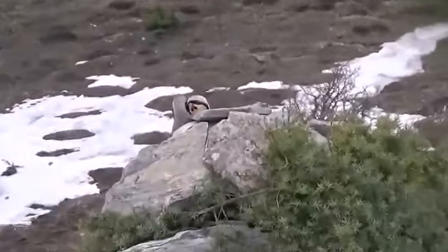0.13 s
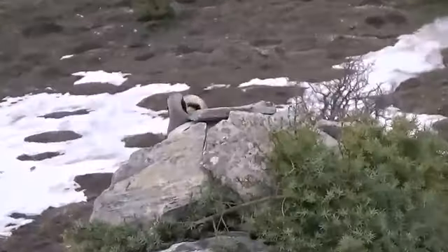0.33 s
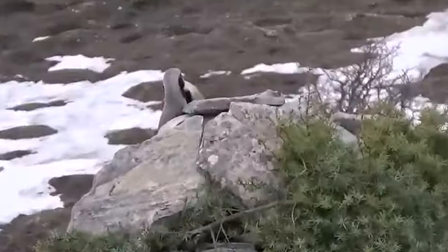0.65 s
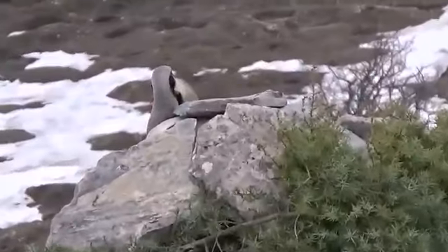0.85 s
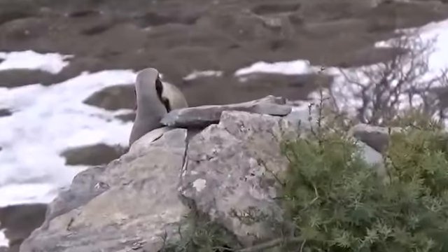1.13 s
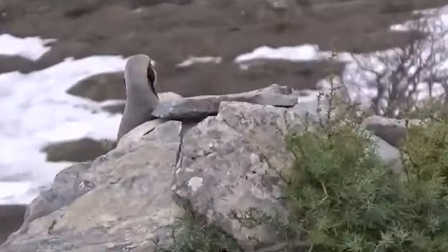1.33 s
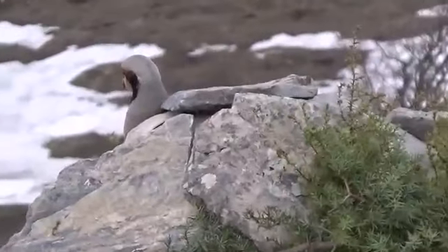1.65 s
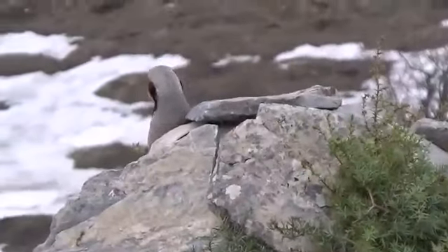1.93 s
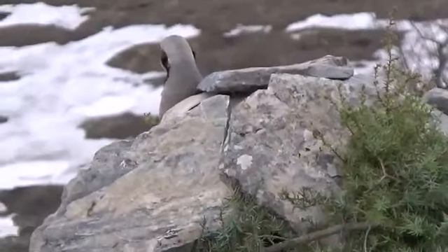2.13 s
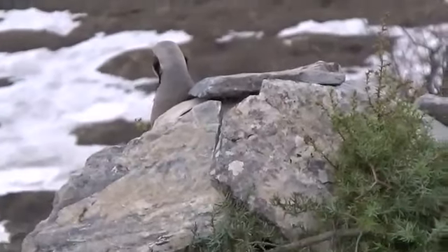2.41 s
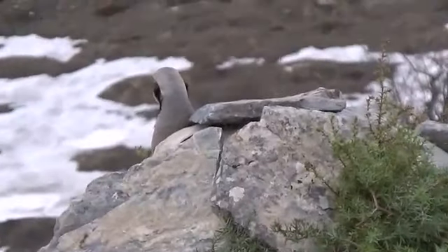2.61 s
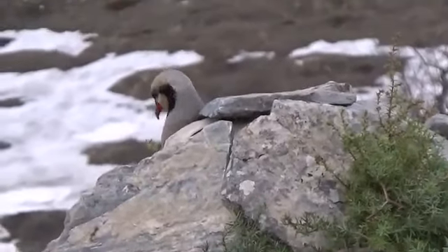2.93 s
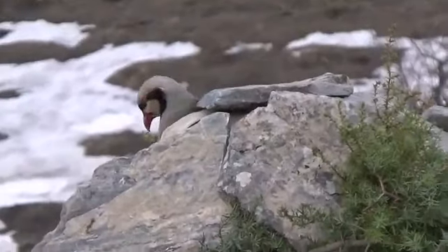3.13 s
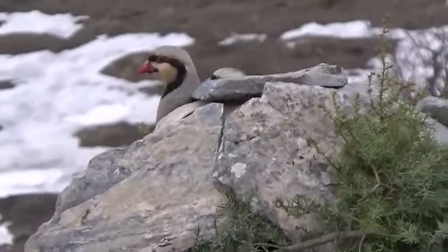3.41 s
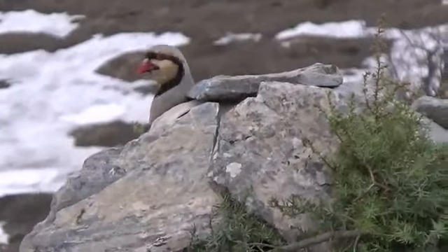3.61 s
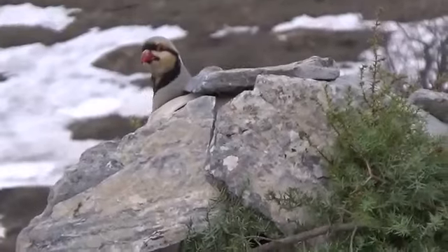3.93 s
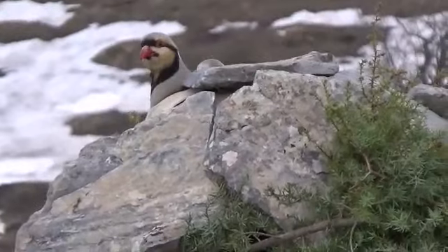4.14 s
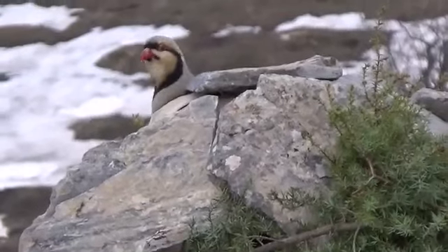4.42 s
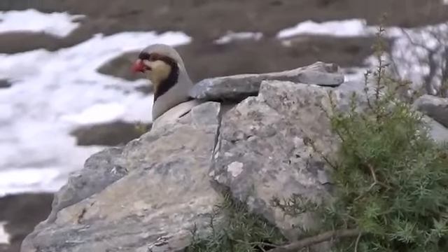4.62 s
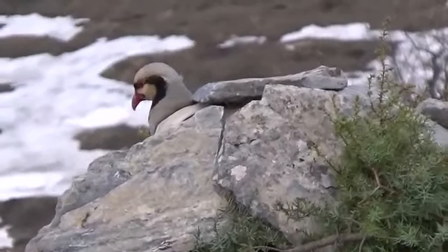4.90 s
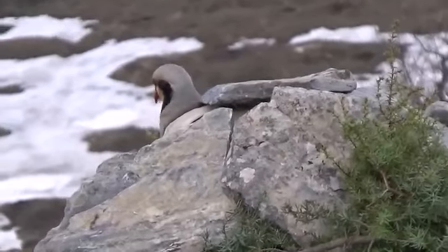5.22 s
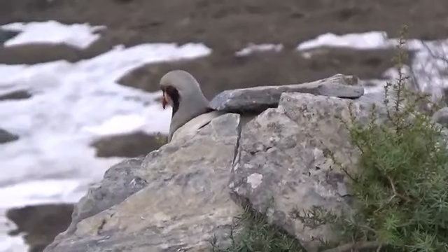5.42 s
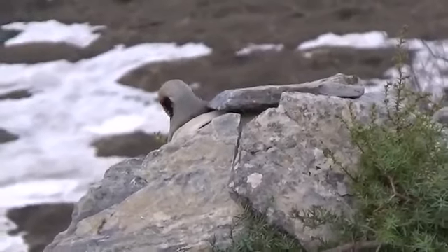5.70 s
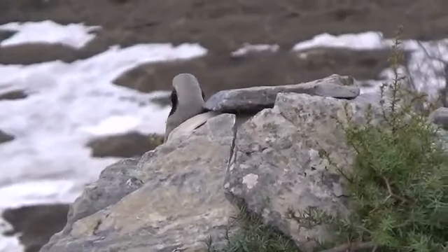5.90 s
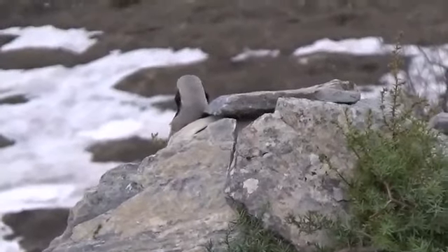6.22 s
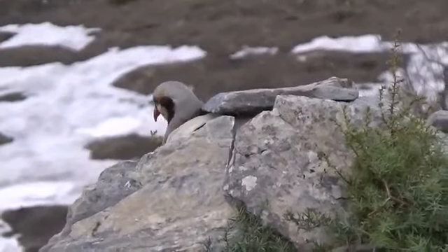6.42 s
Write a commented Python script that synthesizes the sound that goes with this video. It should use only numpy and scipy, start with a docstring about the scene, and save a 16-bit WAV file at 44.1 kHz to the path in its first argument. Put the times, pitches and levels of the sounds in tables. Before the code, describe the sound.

On a quiet mountainside, nearby partridges trade short, high squeaky calls and raspy notes, with occasional stone clicks and twig snaps.

```python
"""Chukar partridges on a mountainside

Close to the microphone and a little to the right, the birds call to one another across a quiet slope.
The syrinx whistles quick arches of pitch, hoarse at the ends and purer on top: high squeals that drop
into a low cluck, soft peeps, fluttering rasps. Stones click and twigs snap over a light breeze and hiss."""
import sys
import numpy as np
from scipy import signal
from scipy.fft import rfft, irfft
from scipy.io import wavfile
from scipy.ndimage import map_coordinates

SR = 44100
rng = np.random.default_rng(int(sys.argv[2]) if len(sys.argv) > 2 else 0)


def digitize_waveform(pressure):
    """Quantize a signal to 16-bit integers and store it at the path in sys.argv[1].

    Rows of a 2-D input are taken as channels; values are limited to [-1, 1].
    """
    field = np.atleast_2d(pressure).T
    bounded = np.clip(field, -1, 1)
    quanta = np.round(bounded * 32767).astype(np.int16)
    wavfile.write(sys.argv[1], SR, quanta)


N = 288855
FOOT_HZ = 1488  # squeals and rasps climb from this pitch
# resonances of the bird's throat: f/Hz, width/Hz, level/dB
THROAT_MODES = [(1566, 160, 4), (2018, 215, 11.5), (2350, 380, 6.5), (3626, 610, 6.5), (4850, 540, 1),
                (5790, 230, -19.5), (8750, 1200, -49), (10580, 690, -12.5)]
# bright spectrum of a snapping twig and of the fizz at the beak: f/Hz, level/dB
BRIGHT_SPECTRUM = [(500, -3), (2000, -10.5), (4000, -5.5), (5200, -1.5), (6500, -2), (8200, 2), (10500, 4),
                   (12000, -46)]


def gain_of(db):
    """Decibels to amplitude."""
    return 10 ** (np.asarray(db) / 20)


def unit_rms(x):
    """Scales to rms 1."""
    return x / np.sqrt(np.mean(x ** 2) + 1e-20)


def add(mix, start, sound):
    """Mixes a sound in at its start time."""
    part = mix[max(round(start * SR), 0):][:len(sound)]
    part += sound[:len(part)]


def gain_at(spectrum, hz):
    """Gain of a spectrum at the given frequencies."""
    f, db = np.transpose(spectrum)
    return gain_of(np.interp(np.log(hz + 1), np.log(f), db))


def noise(spectrum, size):
    """Noise of rms 1 with the given spectrum."""
    gains = gain_at(spectrum, np.fft.rfftfreq(size, 1 / SR))
    return unit_rms(irfft(rfft(rng.standard_normal(size)) * gains, size))


def wander(t, rate):
    """A smooth random curve of rms about 1 that changes rate times a second."""
    knots = rng.standard_normal(int((t[-1] - t[0]) * rate) + 4)
    return map_coordinates(knots, [(t - t[0]) * rate + 1], order=3, mode="nearest")


def resonate(x, modes):
    """A bank of resonances, each applied twice for steep skirts."""
    out = 0
    for hz, width, db in modes:
        b, a = signal.iirpeak(hz, hz / (1.55 * width), fs=SR)
        out = out + gain_of(db) * signal.lfilter(b, a, signal.lfilter(b, a, x))
    return out


def air():
    """A steady hiss and a soft breeze that swells now and then, mostly alike left and right."""
    # spectra of the hiss and of the moving air: f/Hz, level/dB
    hiss = [(15, -95), (25, -26), (118, -9.5), (531, -10.5), (619, -26.5), (778, -15), (1110, -13.5),
            (1400, -9), (2050, -12.5), (2390, -11.5), (3320, -15.5), (3680, -11.5), (4870, -15.5),
            (8310, -13), (11000, -17), (14300, -119), (22000, -120)]
    breeze = [(100, -31), (250, -14), (430, -5), (800, -7), (1300, -13), (2500, -18), (5000, -25),
              (11000, -35.5)]
    # strength of the breeze: t/s, relative level/dB
    gusts = [(0.0, -67.5), (1.06, -66), (1.88, -69), (1.99, -67), (2.39, -68.5), (2.72, -67), (3.1, -68),
             (3.57, -66), (3.81, -66.5), (4.45, -62.5), (5.05, -70), (6.29, -69), (6.55, -71.5)]
    t = np.arange(N) / SR
    swell = gain_of(1.5 + np.interp(t, *np.transpose(gusts)) + 1.02 * wander(t, 26))
    mid, side = (gain_of(-69) * noise(hiss, N) + swell * noise(breeze, N) for _ in range(2))
    return mid + gain_of(-9) * side * np.array([[1], [-1]])


def membrane(t, hz, jitter):
    """One sharp pulse each time the bird's slow membrane closes, unevenly spaced."""
    turns = np.cumsum(hz * (1 + jitter * wander(t, 700))) / SR + rng.random()
    return unit_rms(sum(np.cos(2 * np.pi * k * turns) for k in range(1, 24)))


def syrinx(t, hz, level_db, hoarse, beak_db, flutter, base_flutter_hz, kick, split, rattle_db,
           second_db, third_db, half_db, croak_db, fizz_db):
    """The syrinx whistles along a pitch curve; as hoarseness grows it flutters, then croaks."""
    # how throat and open beak pass the overtones: f/Hz, level/dB
    beak_response = [(2600, -9.5), (3500, -3), (4300, -16.5), (5000, -10), (6100, -14.5), (7000, -33.5),
                     (8000, -24.5), (9300, -29), (11000, -20)]
    hoarse = np.clip(hoarse, .002, .97)
    # flutter comes in fits; each cycle chokes the whistle for an instant and kicks its pitch up
    flutter_hz = base_flutter_hz * (1 + 1.2 * hoarse) * np.exp(.28 * wander(t, 49.22))
    cycles = np.cumsum(flutter_hz) / SR
    fits = np.exp(.7 * wander(t, 45))
    choke = np.cos(np.pi * cycles) ** 8 * np.tanh(flutter * hoarse * fits)
    hz = hz * (1 + kick * choke + .0031 * wander(t, 121.3) + .0614 * hoarse * wander(t, 301.5))
    # a second, slow membrane beats against the whistle and splits it in two
    slow_hz = 430 + .04 * hz
    slow_phase = 2 * np.pi * np.cumsum(slow_hz * (1 + .0517 * wander(t, 198.7))) / SR
    phase = 2 * np.pi * np.cumsum(hz) / SR + .5 * hoarse * np.sin(slow_phase)
    whistle = np.sin(phase) + split * hoarse * np.sin(phase - slow_phase)
    # the half-order overtone comes from strong and weak cycles taking turns
    for k, db in [(2, second_db), (3, third_db), (3 / 2, half_db)]:
        flicker_db = 2.5 * wander(t, 110)
        whistle += gain_of(db + beak_db + flicker_db) * gain_at(beak_response, k * hz) * np.sin(k * phase)
    whistle = unit_rms(whistle * (1 - .85 * choke))
    pulses = membrane(t, slow_hz * (1 + .1 * wander(t, 90)), jitter=.06)
    throat = resonate(pulses + .25 * rng.standard_normal(len(t)), THROAT_MODES)
    croak = unit_rms(throat * (1 - .7 * choke))
    fizz = gain_of(fizz_db + beak_db) * np.sqrt(hoarse) * (1 - choke) * noise(BRIGHT_SPECTRUM, len(t))
    voice = np.sqrt(1 - hoarse ** 2) * whistle + hoarse ** 1.39 * gain_of(croak_db) * croak + fizz
    # a hoarse voice comes in lumps
    rattle = unit_rms(gain_of(rattle_db * np.sqrt(hoarse) * np.tanh(wander(t, 170))))
    fade = signal.windows.tukey(len(t), min(1, .0031 * SR / len(t)))
    return gain_of(level_db) * rattle * voice * fade


def stages(rise, hold, fall):
    """A note's times, its progress 0-1 through rise, hold and fall, and its seconds outside the hold."""
    t = np.arange(0, rise + hold + fall, 1 / SR)
    up, over, down = np.clip([t / rise, (t - rise) / hold, (t - rise - hold) / fall], 0, 1)
    away = np.maximum(np.maximum(rise - t, t - rise - hold), 0)
    return t, up, over, down, away


def squeal(rise, hold, fall, top_hz, dome, lean, warble, flick, rise_db, top_db, fall_db,
           hoarse_top, hoarse_ends, beak_db, warble_hz=52.6, leap=.2, end_hz=1900, drop_s=.014,
           break_s=.004, onset_db=-18, release_db=-9, catch_db=-5, shut_db=-5):
    """A hoarse climb catches, leaps to a purer high dome, then breaks and drops."""
    t, up, over, down, away = stages(rise, hold, fall)
    low = np.clip(away / break_s, 0, 1)  # 1 in the low register, 0 on the dome
    arch = 1 - dome * (2 * over - 1) ** 2 + lean * (over - .5)
    ripple = warble * np.sin(2 * np.pi * warble_hz * hold * over)
    late_flick = flick * np.exp(-((over - .83) / .13) ** 4)
    crest_hz = top_hz * (arch + ripple + late_flick)
    hz = FOOT_HZ + (crest_hz * (1 - leap * low) - FOOT_HZ) * up ** 1.3
    hz = end_hz + (hz - end_hz) * np.exp(-down * fall / drop_s)
    level_db = np.interp(over, [0, .5, 1], [rise_db, top_db, fall_db])
    level_db += onset_db * (1 - up) ** 3 + release_db * down ** 3 + catch_db * np.sin(np.pi * low)
    level_db -= 7.5 * np.exp(-((hz - 4334) / 183) ** 2)  # the whistle crosses a notch of the throat
    hoarse = hoarse_top + (hoarse_ends - hoarse_top) * low
    return syrinx(t, hz, level_db, hoarse, beak_db + shut_db * low * (down > 0),
                  flutter=3.52, base_flutter_hz=118.37, kick=.11, split=1.23, rattle_db=2,
                  second_db=-.5, third_db=-10, half_db=-25, croak_db=-3.5, fizz_db=-23)


def cluck(length, chest_db, throat_db):
    """The slow membrane alone, sagging in pitch, heard through chest and throat."""
    t = np.arange(0, length, 1 / SR)
    start_hz = 463.5 + 2.34 * (throat_db + 58)  # harder clucks start higher
    pulses = membrane(t, start_hz * (1 - .2 * t / length), jitter=.015)
    chest = unit_rms(resonate(pulses, [(412, 115, -3.4), (970, 78, 2.8), (1427, 120, 1.4)]))
    throat = resonate(pulses + .45 * rng.standard_normal(len(t)), THROAT_MODES)
    closing_beak = signal.butter(2, 3400, fs=SR, output="sos")
    throat = unit_rms(signal.sosfilt(closing_beak, throat))
    envelope = signal.windows.tukey(len(t), .4) * gain_of(.63 * (2.5 - t / length))
    return (gain_of(chest_db) * chest + gain_of(throat_db) * throat) * envelope


def peep(length, first_hz, last_hz, middle_db, hoarse, ends_db=-15):
    """A short throaty glide, loudest in the middle."""
    t = np.arange(0, length, 1 / SR)
    progress = t / length
    hz = first_hz + (last_hz - first_hz) * progress
    level_db = middle_db + ends_db * (2 * progress - 1) ** 2
    return syrinx(t, hz, level_db, hoarse, beak_db=0,
                  flutter=4.8, base_flutter_hz=145.4, kick=.085, split=.62, rattle_db=4.5,
                  second_db=-4.5, third_db=-3, half_db=-11, croak_db=1, fizz_db=-22)


def click(knock_db, ring_db, snap_db):
    """Stone and twig: a dull knock, a short ring and a dry snap, each dying within milliseconds."""
    # spectrum of the knock: f/Hz, level/dB
    knock_spectrum = [(60, -61), (200, -13), (450, 0), (750, 7.5), (1050, 1.5), (1400, -8), (4000, -40)]
    # resonances of a struck stone: f/Hz, width/Hz, level/dB
    stone_modes = [(1447, 22, -3), (2140, 290, -4.5), (2460, 89, -9.5), (3550, 1100, -11.5),
                   (3180, 300, -10), (4230, 380, -32)]
    t = np.arange(2048) / SR

    def burst(x, decay_s):
        return unit_rms(x * np.exp(-t / decay_s)) * np.sqrt(decay_s / 2 / t[-1])

    knock = burst(noise(knock_spectrum, len(t)), decay_s=.0029)
    ringing = resonate(rng.standard_normal(2 * len(t)), stone_modes)[len(t):]
    ring = burst(ringing, decay_s=.0044)
    snap = burst(noise(BRIGHT_SPECTRUM, len(t)), decay_s=.0011)
    hit = gain_of(knock_db) * knock + gain_of(ring_db) * ring + gain_of(snap_db) * snap
    attack = 1 - np.exp(-t / .00016)
    # the hits carry almost no bass
    return signal.sosfilt(signal.butter(2, 230, "highpass", fs=SR, output="sos"), hit * attack)


def rasp(rise, hold, fall, top_hz, rise_db, top_db, fall_db, hoarse_top, hoarse_ends, beak_db,
         dome=.086, waver=.0124, break_hz=1990, break_s=.00505, onset_db=-14, release_db=-12,
         catch_db=-4, throb_db=-4, throb_hz=45, drop_db=-2):
    """A low throbbing grumble swells, leaps to a flat fluttering top, drops back and fades."""
    t, up, over, down, away = stages(rise, hold, fall)
    low = np.clip(away / break_s, 0, 1)  # 1 in the low register, 0 on top
    crest_hz = top_hz * (1 - dome * (2 * over - 1) ** 4 + waver * wander(t, 70.3))
    grumble_hz = FOOT_HZ + (break_hz - FOOT_HZ) * up ** 2 * (1 - down) ** 3.5
    hz = crest_hz + (grumble_hz - crest_hz) * low
    throb = np.sin(np.pi * throb_hz * (away - break_s)) ** 2
    level_db = np.interp(over, [0, .3, 1], [rise_db, top_db, fall_db])
    level_db += onset_db * (1 - up) ** 2 + release_db * down ** 1.87 + catch_db * np.sin(np.pi * low)
    level_db += low * (throb_db * throb + drop_db * (down > 0))
    hoarse = hoarse_top + (hoarse_ends - hoarse_top) * np.sqrt(1 - up + down)
    return syrinx(t, hz, level_db, hoarse, beak_db,
                  flutter=6, base_flutter_hz=154.96, kick=.2, split=.26, rattle_db=7,
                  second_db=2.5, third_db=-2.5, half_db=-7.5, croak_db=2.5, fizz_db=-19.5)


def hillside(x, near_db=-10, near_s=.0062, far_db=-27, far_s=.12):
    """Quick scatter from the rocks nearby and a faint tail from the open slope."""
    # colour of what the slope throws back: f/Hz, level/dB
    echo_spectrum = [(200, 2.5), (1500, -7.5), (3500, -7), (6000, -4), (11000, -28)]
    t = np.arange(SR // 2) / SR

    def tail(decay_s):
        scatter = noise(echo_spectrum, len(t)) * np.exp(-t / decay_s) * (t > .002)
        return unit_rms(scatter) / np.sqrt(len(t))

    responses = [gain_of(near_db) * tail(near_s) + gain_of(far_db) * tail(far_s) for _ in range(2)]
    return np.array([signal.fftconvolve(x, response)[:N] for response in responses])


def scene():
    """Birds and stones close by, a little right of the microphone, in the open air."""
    # high squeals: t/s, rise/s, hold/s, fall/s, top f/Hz; as shares of that pitch: shoulder sag, lean,
    # warble, late flick; rise, top and fall level/dB; hoarseness 0-1 on top, at the ends; beak level/dB
    squeals = [ (0.0, 0.00172, 0.085, 0.044, 3880, 0.091, 0.004, -0.0047, 0, -36, -42, -34.5, 0.359, 0.59, 2.5),
               (.297, 0.025, .067, 0.042, 4028, 0.0294, .03, 0.0068, .12, -31, -34, -31, 0.023, 0.67, 5),
               (0.609, 0.018, 0.064, .028, 4500, 0.18, -0.076, -0.0079, 0.0019, -35, -39, -32.5, 0.18, 0.68, 4),
               (1.016, 0.023, 0.04, 0.032, 4510, .1, 0.015, -0.013, 0.023, -44, -37.5, -38, 0.021, 0.44, 6.5),
               (1.317, 0.018, 0.062, 0.029, 4610, 0.19, -0.076, -0.0017, 0, -37, -32, -36.5, 0.075, 0.65, 5),
               (1.718, 0.026, 0.032, 0.031, 4840, 0.16, -0.061, 0.0015, 0.0018, -44.5, -44, -39.5, 0.247, 0.64, -1),
               (1.990, 0.023, 0.059, 0.044, 4046, 0.073, 0.31, 0.032, 0, -44.5, -52.5, -42.5, 0.073, 0.55, 1),
               (2.408, .017, 0.04, 0.028, 3706, .17, 0.16, .19, 0.01, -44.5, -42.5, -39.5, 0.14, 0.39, -1),
               (3.651, 0.016, 0.034, .012, 3680, .1, 0.34, 0.15, 0.015, -48.5, -47, -44.5, 0.23, .25, -1),
               (3.933, .029, .042, 0.028, 3990, 0.0502, .03, -0.056, 0.012, -43.5, -33, -41.5, 0.091, 0.6, -2.5),
               (4.515, 0.018, 0.039, 0.033, 4000, 0.32, .12, 0.18, 0.011, -46, -58, -59, 0.31, 0.37, -5),
               (4.631, .018, 0.034, 0.031, 3450, 0.17, -0.039, -0.011, 0.012, -45.5, -48.5, -41, 0.26, 0.46, 5.5),
               (4.814, 0.031, 0.044, 0.05, 3960, 0.081, -0.12, 0.035, 0.016, -54, -59, -55.5, .25, 0.535, -13),
               (5.228, 0.028, 0.01, .025, 3900, 0.16, -0.031, 0.03, 0.0054, -56, -67, -54.5, 0.26, 0.375, -7)]
    # lower, fluttering notes: t/s, rise/s, hold/s, fall/s, top f/Hz; rise, top and fall level/dB;
    # hoarseness 0-1 on top, at the ends; beak level/dB
    rasps = [ (1.790, 0.015, 0.024, 0.051, 3084, -38, -40.5, -45.5, 0.47, 0.61, 0),
             (2.125, .032, .048, 0.046, 3055, -41, -38, -42.5, 0.16, .5, 0),
             (2.531, 0.028, 0.075, 0.045, 3030, -43.5, -37.5, -43, 0.22, .3, -1),
             (2.898, 0.032, 0.072, 0.04, 3040, -43, -40.5, -49.5, 0.19, 0.41, -1.5),
             (3.257, .056, 0.056, 0.0062, 3154, -41.5, -37, -50, 0.26, .7, 0),
             (3.374, .027, .020, 0.039, 3050, -41, -41.5, -41.5, 0.34, 0.75, 0),
             (3.698, 0.033, 0.092, 0.051, 3023, -37, -32.5, -39, 0.1, 0.49, 2.5),
             (4.121, .028, .075, 0.048, 2894, -40, -39, -40.5, .28, .5, 1),
             (4.982, .032, 0.07, .05, 3174, -42.5, -33.5, -45.5, .06, 0.56, 0.5),
             (5.365, 0.029, 0.075, 0.044, 3185, -47.5, -37.5, -44, 0.05, 0.48, -6.5),
             (5.757, 0.039, 0.054, 0.055, 3197, -45, -50.5, -47, 0.4, .5, -6.5),
             (6.094, 0.035, 0.041, 0.059, 3160, -46.5, -40, -44.5, 0.08, .5, -1)]
    # soft peeps between the notes: t/s, length/s, first f/Hz, last f/Hz, level/dB, hoarseness 0-1
    peeps = [(0.143, 0.037, 1720, 1410, -46.5, 0.47), (0.537, 0.047, 1713, 1274, -50.5, 0.77),
             (0.78, 0.022, 1340, 2430, -43.5, 0.33), (0.807, 0.021, 2080, 2840, -41.5, .35),
             (0.832, .036, 2016, 1370, -53, .55), (1.193, .023, 1547, 2400, -41, 0.37),
             (1.22, 0.0229, 1745, 2750, -44, .35), (1.253, .036, 1920, 1670, -60.5, .7),
             (1.477, 0.027, 1420, 1654, -45, 0.12), (1.495, .024, 1617, 2105, -41, 0.32),
             (1.523, 0.035, 1500, 1840, -51.5, 0.49), (2.328, .04, 2050, 1534, -58, 0.52),
             (2.744, 0.036, 1534, 1164, -56.5, 0.4), (3.523, 0.021, 2430, 2020, -58, 0.47),
             (4.793, 0.043, 2010, 1560, -54.5, 0.49), (6.308, 0.062, 1703, 1480, -56.5, 0.63)]
    # low clucks, most of them closing a squeal: t/s, length/s, relative chest and throat level/dB
    clucks = [(0.101, 0.048, -52, -45.5), (0.411, 0.037, -52, -45), (0.7, 0.04, -56, -46),
              (0.951, 0.029, -60, -65.5), (1.092, 0.038, -57, -49.5), (1.414, 0.04, -53.5, -47.5),
              (1.793, 0.053, -58.5, -51.5), (2.096, 0.034, -61.5, -52), (2.467, 0.036, -62, -50),
              (2.973, .023, -64, -47.5), (3.567, 0.018, -60, -66.5), (4.015, 0.032, -57, -49.5),
              (4.581, 0.034, -63.5, -57.5), (4.709, 0.0292, -69, -58), (4.9, .039, -59, -65.5),
              (5.122, 0.027, -63, -66), (5.283, .023, -63, -65), (5.86, 0.046, -67.5, -72.5),
              (6.229, 0.026, -64.5, -67.5)]
    # stones and twigs: t/s, knock level/dB, ring level/dB, snap level/dB
    clicks = [(0.709, -80, -65, -40.5), (0.8954, -75, -61, -44.5), (1.628, -56, -56, -52),
              (1.653, -66, -47, -49), (1.661, -64, -52.5, -56), (1.9003, -43, -29, -28.5),
              (2.999, -84, -51, -42), (3.6495, -73, -44, -34), (3.892, -66, -56, -51.5),
              (4.064, -75, -72, -53), (4.337, -65, -56, -53.5), (5.3086, -67, -50.5, -40.5),
              (5.332, -81, -60, -51), (5.3533, -75, -61, -47), (5.412, -44.5, -41, -48),
              (5.539, -36.5, -44, -32), (5.588, -72, -56, -42.5), (5.629, -75, -69, -50),
              (5.8703, -53, -48, -50), (6.376, -76, -52, -31), (6.381, -71, -65, -51),
              (6.3904, -63, -41.5, -28.5)]
    birds, stones = np.zeros((2, N))
    for voice, notes in [(squeal, squeals), (rasp, rasps), (peep, peeps), (cluck, clucks)]:
        for start, *settings in notes:
            add(birds, start, voice(*settings))
    for start, *levels in clicks:
        add(stones, start, click(*levels))
    direct = birds * gain_of([[-1.25], [1.25]]) + stones * gain_of([[-.9], [.8]])
    return direct + hillside(birds + stones) + air()


def record(dry):
    """The microphone's bass cut and the recorder's band limit."""
    bass_cut = signal.butter(2, 85, "highpass", fs=SR, output="sos")
    band_limit = signal.firwin(401, 11250, window=("kaiser", 7), fs=SR)
    return signal.oaconvolve(signal.sosfilt(bass_cut, dry), band_limit[None], "same")


dry = scene()
out = record(dry)
digitize_waveform(out)
```